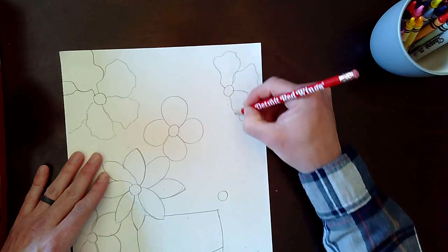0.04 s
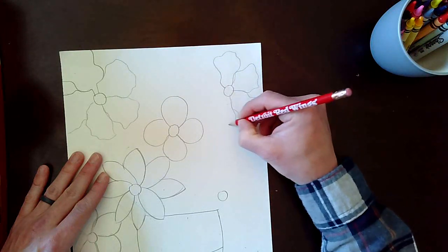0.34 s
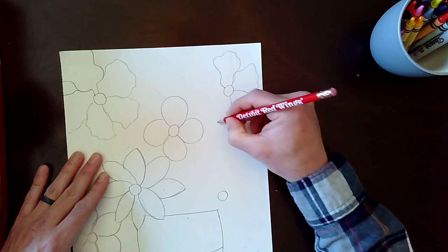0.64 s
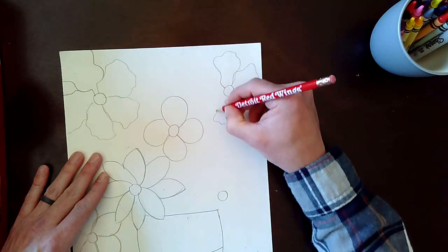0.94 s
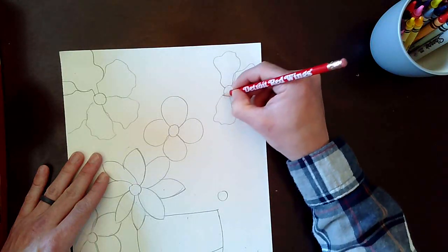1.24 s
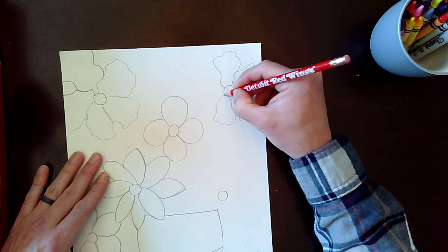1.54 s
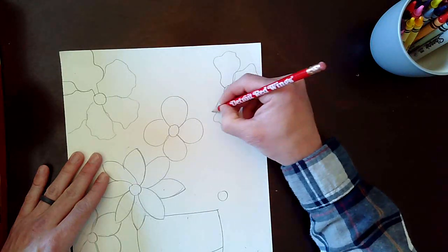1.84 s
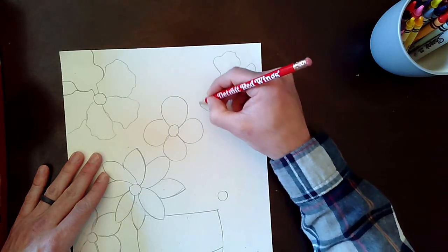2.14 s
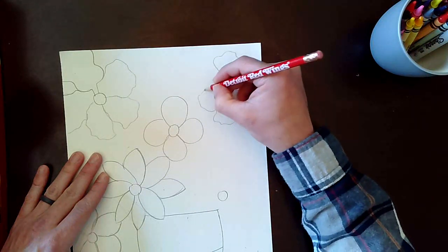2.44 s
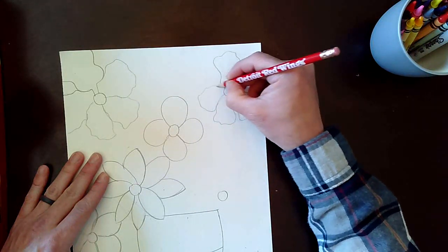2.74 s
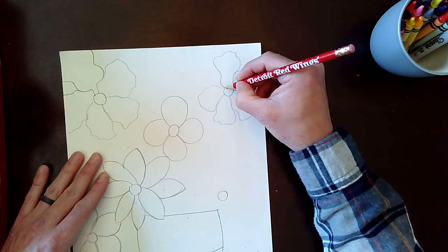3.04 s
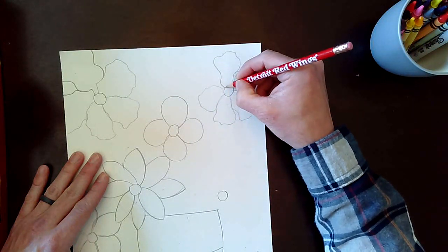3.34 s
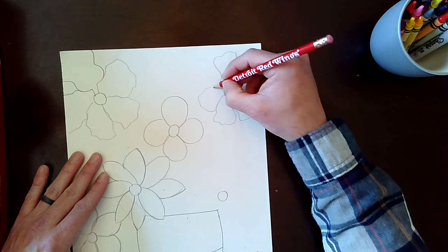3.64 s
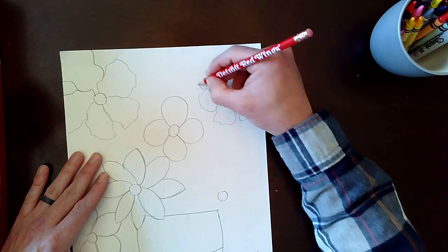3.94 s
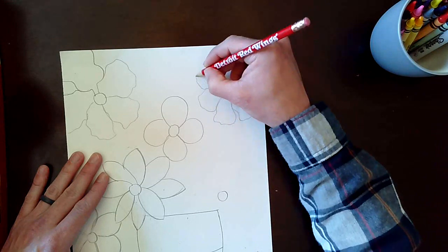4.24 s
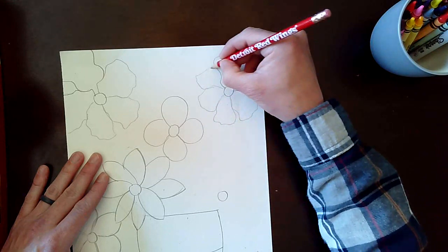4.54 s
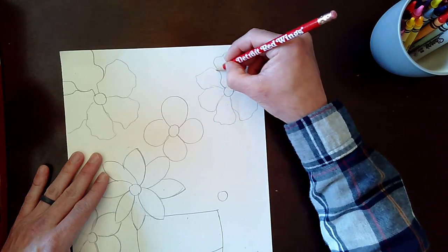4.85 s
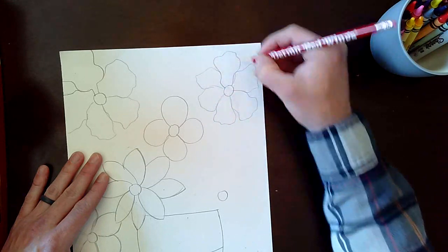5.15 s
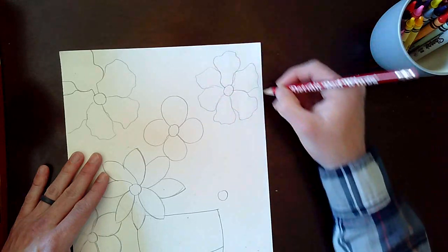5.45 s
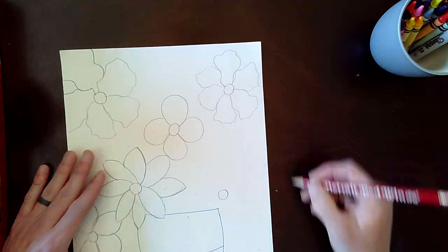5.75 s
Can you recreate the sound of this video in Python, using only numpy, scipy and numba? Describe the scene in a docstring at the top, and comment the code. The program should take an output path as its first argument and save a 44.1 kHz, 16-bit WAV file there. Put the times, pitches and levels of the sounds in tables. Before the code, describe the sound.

In a quiet room, heard from close by, a pencil makes light, hissy strokes on paper, stopping and starting. The hand brushes the sheet and softly bumps the wooden table between groups of strokes. After a last run of scratches, the forearm drags away with a rising swish of cloth, several sharp cuff clicks and a light knock, the loudest part.

```python
"""Pencil on paper

A pencil outlines flower petals on one sheet of paper on a wooden table, in a quiet room. Stick-slip
friction of the lead on the fibres excites the modes of pencil, sheet and table top; between strokes
the hand shifts. At the end the forearm slides off: the sleeve swishes, its cuff clicks and the wrist
bumps the table."""
import sys
import numpy as np
from scipy import signal
from scipy.fft import rfft, irfft
from scipy.io import wavfile
from scipy.ndimage import uniform_filter1d
from numba import njit

SR = 44100
rng = np.random.default_rng(int(sys.argv[2]) if len(sys.argv) > 2 else 0)


def wav_out(sig):
    """Save sig, one row per channel (or a flat mono array), as 16-bit PCM at SR to the path in sys.argv[1]."""
    wavfile.write(sys.argv[1], SR, np.round(np.clip(np.atleast_2d(sig).T, -1, 1) * 32767).astype(np.int16))


N = 264820
TIME = np.arange(N) / SR

# Pencil strokes: t/s, rise/s, fall/s, nominal level/dB, then relative to it hiss/dB,
# shaft and sheet/dB, table top/dB; tip mode f/Hz
PENCIL_STROKES = [ (-0.02, 0.03, 0.16, -45.5, -6, -9, -19.5, 6070),
                  (0.17, 0.077, 0.037, -64, 3.5, 8, 4.5, 6060),
                  (0.338, 0.1, 0.043, -60, -4.5, 0.5, 3.5, 5940),
                  (0.46, 0.044, 0.12, -65.5, -1.5, 1.5, 5, 5830),
                  (0.599, 0.053, 0.19, -61, -3.5, -4, -5.5, 6030),
                  (0.84, 0.054, .04, -61, 2, -4, -10, 6300), (0.985, .035, 0.057, -66, -2, -4, -10.5, 6100),
                  (1.087, 0.021, 0.1, -58, 1, -1.5, -16.5, 6570),
                  (1.225, 0.032, 0.026, -61, -3.5, -8, -17, 6500),
                  (1.274, 0.024, 0.064, -67, -1, 1, -6, 6500),
                  (1.717, 0.052, 0.049, -48.5, 0.5, -5, -13, 6400),
                  (1.79, 0.025, 0.063, -64.5, -3, 6.5, 7.5, 6450),
                  (1.89, .11, .10, -50, -5.5, -8, -5, 6030),
                  (2.182, 0.035, 0.051, -47.5, -4.5, -11.5, -23, 6250),
                  (2.265, 0.034, 0.13, -64, -1.5, -8, -7.5, 6230),
                  (2.448, .025, 0.078, -58, -2, -9.5, -15.5, 6500),
                  (2.645, .035, 0.1, -67.5, 1, -3.5, -11, 6200),
                  (2.765, 0.081, 0.051, -56.5, -9, -11, -20, 6250),
                  (3.769, .09, 0.082, -47, -6, -9.5, -8.5, 5960),
                  (3.889, 0.077, 0.082, -49.5, -6, -4.5, -8, 6070),
                  (4.03, 0.028, 0.036, -66.5, -5, -3, 5.5, 5820),
                  (4.11, 0.13, 0.036, -70, 4, 1.5, -2.5, 6250),
                  (4.218, 0.016, 0.042, -50.5, -1, -2, -14, 6900),
                  (4.265, 0.021, .05, -68.5, -8, 9, 3, 6800), (4.324, 0.088, 0.11, -54, -4, -8, -9, 6230),
                  (4.53, 0.03, 0.11, -70.5, -3.5, -7, -1, 6230),
                  (4.797, 0.023, 0.076, -65.5, 1.5, -1, -24, 6200),
                  (4.875, 0.056, 0.076, -52.5, -9.5, -9.5, -21, 6160),
                  (4.991, 0.0079, .033, -59, 3.5, -7, -16, 6200), ]
# Shaft modes, tuned and damped by the fingers: t/s, low mode f/Hz, its level/dB, high mode f/Hz
SHAFT_MODES = [(0, 2830, -2.5, 4260), (.4, 2840, -0.5, 3980), (1.15, 2780, -7.5, 3860),
               (1.8, 2800, 3, 4320), (1.93, 2700, -0.5, 4050), (2.1, 2450, -1.5, 3920),
               (2.5, 2360, -13, 4300), (2.85, 2450, -11.5, 4330), (4.0, 2390, -4, 4110),
               (4.25, 2300, -19, 3850), (4.42, 2290, -7.5, 4260), (4.9, 2390, -15.5, 4400)]
# Spectrum of the fibres under the lead: f/Hz, level/dB
FIBRE_SPECTRUM = [(300, -2), (1500, -25.5), (3600, -14.5), (5100, -0.5), (6900, 4.5), (8000, 4.5),
                  (10000, 4.5), (12300, -2.5), (13300, -3.5), (15800, -8.5)]
# Overtones of the pencil's point: f/Hz, width/Hz, level/dB
TIP_OVERTONES = [(6926, 860, 2.5), (7800, 2100, -0.5), (9700, 920, -23), (12030, 1600, 0)]
# Modes of the sheet: f/Hz, width/Hz, level/dB
SHEET_MODES = [(2210, 510, 0.5), (2596, 350, 1.5), (3026, 145, -4.5), (3407, 600, -0.5), (3797, 830, -1),
               (4504, 500, -1.5), (4870, 760, -0.5), (5505, 230, 1)]
# Modes of the table top: f/Hz, width/Hz, level/dB
WOOD_MODES = [(133, 180, -18), (386, 330, -12), (712, 143, -0.5), (920, 184, -2), (1118, 143, 0.5),
              (1337, 113, -2), (1823, 230, -6)]
# Judders of the lead against the grain: t/s, rise/s, fall/s, level/dB, f/Hz
LEAD_JUDDERS = [(0.405, 0.029, 0.018, -57.5, 687), (0.495, 0.023, 0.066, -64, 678),
                (1.88, 0.032, 0.053, -61.5, 660), (3.85, .025, .05, -64, 720), (4.96, .02, .015, -67, 960)]
# Shifts of the hand: t/s, rise/s, fall/s, nominal level/dB, swish f/Hz,
# relative brush/dB, relative drag/dB
HAND_SHIFTS = [(1.526, 0.022, 0.058, -67.5, 5340, -10, -8), (2.95, 0.056, 0.048, -78, 7050, -0.5, -14),
               (3.196, 0.019, 0.044, -61.5, 8300, -10, -40), (3.43, 0.065, 0.033, -58.5, 6700, -4.5, -10.5),
               (3.50, 0.042, 0.077, -55, 5700, -6.5, -11.5), (3.625, 0.035, 0.066, -54, 5500, -3, -8),
               (3.70, 0.078, 0.14, -55, 5500, -8, -29)]
# Slide of the forearm: t/s, nominal level/dB, swish f/Hz, relative brush/dB, relative drag/dB
ARM_SWEEP = [(5.14, -77, 6700, 0, -27), (5.197, -56, 6600, -9, -32), (5.206, -52.5, 6430, -2, -21),
             (5.245, -48.5, 5430, -13, -17), (5.3, -48, 6600, -11, -20.5), (5.39, -48.5, 7650, -14.5, -40),
             (5.438, -46, 7800, -9.5, -27), (5.46, -48, 6840, 2.5, -5.5), (5.55, -47, 5560, 0.5, -9.5),
             (5.67, -37, 5100, -1.5, -21.5), (5.715, -34.5, 5030, -2, -4.5), (5.79, -32, 5230, -6.5, -12.5),
             (5.85, -36, 6460, -7, -10.5), (5.9, -37, 5900, -5.5, -14), (5.912, -56, 6000, 7.5, -2),
             (6.0, -68.5, 6500, 10, -4)]
# Spectrum of brushing cloth: f/Hz, level/dB
BRUSH_SPECTRUM = [(600, -31), (1400, -20.5), (2500, -16), (3900, -3.5), (4750, -1.5), (6000, 1.5),
                  (8500, 3.5), (11000, -4), (13500, -12), (15700, -16)]
# Spectrum of the arm dragging on wood: f/Hz, level/dB
DRAG_SPECTRUM = [(45, -5), (75, 2), (165, 1), (280, -13), (550, -4.5), (1000, -10.5), (1400, 1), (1620, 2),
                 (1900, 5), (2500, -2), (3000, 7), (4000, -5), (6000, -47)]
# Zips of the weave over the paper's edge: t/s, rise/s, fall/s, level/dB, starting f/Hz
WEAVE_ZIPS = [(5.275, .04, .008, -41, 6510), (5.333, 0.026, .03, -44, 6600), (5.822, .012, .005, -33, 6420),
              (5.845, .008, .008, -32, 7240)]
# Ticks of lead and cuff: t/s, peak level/dB, f/Hz, nominal width/Hz, T60/s
HARD_CONTACTS = [(0.474, -46, 8600, 5000, 0.013), (1.091, -45.5, 8500, 5000, .03),
                 (1.626, -53.5, 9200, 4000, 0.0064), (2.197, -38.5, 6300, 1100, .08),
                 (4.2199, -44, 3720, 900, 0.15), (4.225, -32.5, 8700, 3470, 0.03),
                 (4.799, -48, 6300, 7100, 0.028), (5.0712, -40, 7900, 5070, 0.01),
                 (5.203, -45, 6200, 5000, 0.052), (5.487, -29.5, 7700, 3000, .011),
                 (5.514, -33, 7840, 5000, 0.0079), (5.596, -24, 7800, 5000, .009),
                 (5.602, -19.5, 5950, 4000, 0.0093), (5.677, -11.5, 4600, 1080, .0066),
                 (5.68, -19.5, 3180, 1490, 0.0085), (5.6912, -15, 8640, 3000, 0.019),
                 (5.692, -29, 4760, 1000, 0.038), (5.708, -19.5, 1740, 1930, .01),
                 (5.836, -15.5, 6470, 1800, 0.0065), (5.866, -20, 5270, 5000, 0.01),
                 (5.897, -22.5, 5600, 2500, 0.0081)]
# Bumps of hand and wrist on the table: t/s, nominal level/dB, f/Hz, T60/s
SOFT_CONTACTS = [(1.637, -51, 401, 0.06), (1.65, -52.5, 277, 0.11), (1.662, -51.5, 179, 0.068),
                 (3.674, -53, 374, 0.12), (3.697, -50, 240, 0.09), (4.803, -59.5, 346, 0.11),
                 (5.708, -32.5, 760, 0.014), (5.719, -32, 117, 0.047), (5.817, -38.5, 487, 0.031),
                 (5.877, -60, 115, 0.062)]
# Spectrum of the room's noise: f/Hz, level/dB
ROOM_SPECTRUM = [(15, -47), (25, -12), (86, -2), (194, -3), (228, -9), (307, -7), (380, -11), (586, -12.5),
                 (767, -16), (854, -18.5), (1000, -17), (1120, -18.5), (1350, -23), (15700, -29)]
# Hum of a distant appliance: f/Hz, level/dB
HUM_PARTIALS = [(124, -93.5), (328, -82)]


def pencil():
    """Stick-slip excitation: the lead snaps over fibres and drives point, shaft, sheet and table."""
    strokes = np.array(PENCIL_STROKES)
    scratch_db, hiss_db, shaft_db, table_db, pitch_hz = strokes[:, 3:].T
    motion = swells(strokes[:, :3], depth_db=8.5, release_db_per_s=324)
    tip_hz = handover(motion, pitch_hz)
    low_hz, low_db, high_hz = curves(SHAFT_MODES)
    # the paper's uneven tooth makes the friction flutter
    slips = grains(per_s=9000, spread_db=1.5) * undb(0.83 * walk(260) + 0.37 * walk(60))
    tip = ring(slips, tip_hz * (1 + 0.03 * walk(25)), width_hz=940) * undb(-3)
    fibres = colour(slips, FIBRE_SPECTRUM) * undb(2)
    overtones = modes(slips, TIP_OVERTONES, wander_db=2.5, drift=0.02) * undb(-7)
    # the shaft's pitch wavers as the fingers steer it
    shaft_low = ring(slips, low_hz * (1 + 0.014 * walk(21.06)), width_hz=310) * undb(low_db)
    shaft_high = ring(slips, high_hz * (1 + 0.026 * walk(18)), width_hz=320) * undb(-12)
    sheet = modes(slips, SHEET_MODES, wander_db=5, drift=0.023) * undb(-2.5)
    # when the point rings higher, the table's upper modes answer more strongly
    tilt = 0.0244 * (tip_hz - 6084)
    table = modes(slips, WOOD_MODES, wander_db=2.5, drift=0.047, tilt_db_per_octave=tilt) * undb(0.17)
    parts = [(tip, 0), (fibres + overtones, hiss_db), (shaft_low + sheet, shaft_db),
             (shaft_high, shaft_db - hiss_db),  # sings less the more the point hisses
             (table, table_db)]
    return sum(sound * loudness(motion, scratch_db + share_db) for sound, share_db in parts)


def judder():
    """Friction-induced vibration: the lead slips in step with one table mode, in a hollow groan."""
    judders = np.array(LEAD_JUDDERS)
    db, hz = judders[:, 3:].T
    motion = swells(judders[:, :3], depth_db=7.5, release_db_per_s=450)
    return loudness(motion, db) * ring(rng.standard_normal(N), handover(motion, hz), width_hz=100)


def sleeve():
    """Sliding friction follows the motion: small shifts of the hand, then the forearm's sweep."""
    shifts = np.array(HAND_SHIFTS)
    db, hz, brush_db, drag_db = shifts[:, 3:].T
    motion = swells(shifts[:, :3], depth_db=6.5, release_db_per_s=260)
    shifting = [handover(motion, hz)] + [loudness(motion, db + part) for part in (0, brush_db, drag_db)]
    db, hz, brush_db, drag_db = curves(ARM_SWEEP)
    sweeping = [hz] + [undb(db + part) for part in (0, brush_db, drag_db)]
    sweep_start_s = ARM_SWEEP[0][0]
    return rub(*np.where(TIME < sweep_start_s, shifting, sweeping))


def rub(swish_hz, swish_gain, brush_gain, drag_gain):
    """Roughness noise: cloth and skin brush the paper while the arm's weight drags on the wood."""
    catch = undb(1.33 * walk(200))  # the cloth catches and lets go
    brush = colour(grains(per_s=16000, spread_db=4), BRUSH_SPECTRUM)
    cloth_slips = grains(per_s=8000, spread_db=3)
    swish = ring(cloth_slips, swish_hz * (1 + 0.039 * walk(25)), width_hz=2230) * undb(-4.5)
    drag = grains(per_s=5500, spread_db=1.8)
    edge_s, crossing_s = 5.9, 0.051  # the wrist leaves the paper and bare wood takes over
    on_wood = np.clip((TIME - edge_s) / crossing_s, 0, 1)
    sheet = modes(drag, SHEET_MODES, wander_db=7.5, drift=0.056, tilt_db_per_octave=-3)
    sheet *= undb(-4 - 10 * on_wood)
    wood = colour(drag, DRAG_SPECTRUM) * undb(-1.5 + 4.3 * on_wood)
    return catch * (brush * brush_gain + swish * swish_gain) + (sheet + wood) * drag_gain


def weave(glide_hz_per_s=5400):
    """Periodic plucking: threads cross the paper's edge in a whistle that rises as the arm speeds up."""
    zips = np.array(WEAVE_ZIPS)
    start, _, _, db, first_hz = zips.T
    motion = swells(zips[:, :3], depth_db=10, release_db_per_s=605)
    elapsed = np.maximum(TIME - handover(motion, start), 0)
    hz = handover(motion, first_hz) + glide_hz_per_s * elapsed
    stutter = unit(undb(4.5 * walk(230)))
    return loudness(motion, db) * stutter * ring(rng.standard_normal(N), hz, width_hz=510)


def ticks():
    """Impact transients: each hard contact is a fast-decaying burst of tiny blows on a resonance."""
    out, t = np.zeros(N), TIME[:8192]
    for start, db, hz, width_hz, t60 in HARD_CONTACTS:
        impacts = rng.choice([-1., 1.], len(t)) * decay(t, t60)
        burst = ring(impacts, hz, 1.15 * width_hz)
        add(out, start, undb(db) * burst / np.abs(burst).max())
    return out


def bumps():
    """Damped free vibration: a soft blow swings the table top, with a dull rumble around its pitch."""
    out, t = np.zeros(N), TIME[:8192]
    for start, db, hz, t60 in SOFT_CONTACTS:
        swing = np.sin(2 * np.pi * hz * t)
        onset = 1 - np.exp(-t / .002)
        rumble = ring(rng.standard_normal(len(t)), hz, 1.1 * hz) * onset
        add(out, start, undb(db) * (0.71 * swing + 0.74 * rumble) * decay(t, t60))
    return out


def reflections(x, t60, wet_db):
    """Diffuse reflection: echoes from nearby surfaces merge into an exponentially decaying tail."""
    t = TIME[:16384]
    tail = rng.standard_normal(len(t)) * decay(t, t60) * (t > .002)
    return undb(wet_db) * signal.fftconvolve(x, tail / np.linalg.norm(tail))[:N]


def room_tone():
    """Ambient noise: broadband rumble and faint hiss, with the tonal hum of a distant appliance."""
    air = colour(rng.standard_normal(N), ROOM_SPECTRUM) * undb(-71 + .5 * walk(4.9))
    hum = sum(undb(db + 2 * walk(2.6)) * np.sqrt(2) * np.sin(2 * np.pi * hz * TIME)
              for hz, db in HUM_PARTIALS)
    return air + hum


def modes(x, table, wander_db, drift, tilt_db_per_octave=0):
    """Modal superposition: modes swell and fade as the contact passes nodes; the hand detunes them."""
    centre_hz = np.median([hz for hz, _, _ in table])
    out = 0
    for hz, width_hz, db in table:
        octaves = np.clip(np.log2(hz / centre_hz), -1, 1)
        share_db = db + wander_db * np.tanh(walk(11)) + tilt_db_per_octave * octaves
        out = out + undb(share_db) * ring(x, hz * (1 + drift * walk(8)), width_hz)
    return unit(out)


def ring(x, hz, width_hz):
    """Resonance with steep skirts: two band-passes in cascade, each width_hz wide, at rms 1."""
    centre_hz = np.minimum(hz * np.ones(len(x)), .45 * SR)
    once = bandpass(x, centre_hz, float(width_hz))
    return unit(bandpass(once, centre_hz, float(width_hz)))


@njit
def bandpass(x, hz, width_hz):
    """Second-order resonator: a state-variable filter with a moving centre."""
    y, band_state, low_state = np.empty(len(x)), 0., 0.
    for i in range(len(x)):
        gain, damping = np.tan(np.pi * hz[i] / SR), width_hz / hz[i]
        band = (band_state + gain * (x[i] - low_state)) / (1 + gain * (gain + damping))
        band_state = 2 * band - band_state
        low_state += 2 * gain * band
        y[i] = damping * band
    return y


def colour(x, spectrum):
    """Spectral shaping by (f/Hz, level/dB) points, at rms 1."""
    hz, db = np.transpose(spectrum)
    bins_hz = np.maximum(np.fft.rfftfreq(N, 1 / SR), 1)
    gain = undb(np.interp(np.log(bins_hz), np.log(hz), db))
    return unit(irfft(rfft(x) * gain, N))


def grains(per_s, spread_db):
    """Shot noise: tiny slips at random moments, a few much stronger than the rest."""
    sizes = undb(spread_db * np.minimum(rng.exponential(size=N), 5))
    slipping = rng.random(N) < per_s / SR
    return unit(slipping * rng.choice([-1, 1], N) * sizes)


def walk(per_s):
    """Random modulation at rms 1, gliding to a new value per_s times a second."""
    hold = max(int(SR / per_s), 1)
    steps = np.repeat(rng.standard_normal(N // hold + 1), hold)
    return unit(uniform_filter1d(steps, hold)[:N])


def swells(timing, depth_db, release_db_per_s):
    """Friction noise grows with speed: one envelope for each movement's (t/s, rise/s, fall/s)."""
    envelopes = []
    for start, rise, fall in timing:
        t = TIME - start - rise  # from the fastest moment
        slowness = np.maximum(-t / max(rise, .002), np.minimum(t / max(fall, .002), 1))
        db = -depth_db * slowness ** 1.73 - release_db_per_s * np.maximum(t - fall, 0)
        envelopes.append(undb(np.maximum(db, -120)))
    return np.array(envelopes)


def loudness(envelopes, db):
    """Incoherent addition: the gain of movements whose powers sum, each at its own level."""
    return np.sqrt(undb(db) ** 2 @ envelopes ** 2)


def handover(envelopes, values):
    """Weighted mean: a setting passes smoothly from each movement to the next."""
    weights = envelopes + 1e-9
    return values @ weights / weights.sum(axis=0)


def curves(rows):
    """Linear interpolation of each column over the times in the first."""
    times, *columns = np.transpose(rows)
    return [np.interp(TIME, times, column) for column in columns]


def decay(t, t60):
    """Exponential damping: 60 dB down at t60."""
    return np.exp(-np.log(1000) * t / t60)


def add(out, start_s, sound):
    """Superposition of a short sound from start_s on."""
    start = int(start_s * SR)
    out[start:start + len(sound)] += sound[:N - start]


def undb(db):
    """Amplitude ratio of a level in decibels."""
    return 10 ** (np.asarray(db) / 20)


def unit(x):
    """Normalisation to rms 1."""
    return x / np.sqrt(np.mean(x ** 2))


def scene():
    """Superposition of the direct sound from the table, its reflections and the room's noise."""
    direct = pencil() + judder() + sleeve() + weave() + ticks() + bumps()
    # a cup and other small things on the table reflect only short wavelengths
    treble = signal.sosfilt(signal.butter(2, 1800, "high", fs=SR, output="sos"), direct)
    echoes = reflections(treble, t60=0.052, wet_db=-9) + reflections(direct, t60=0.14, wet_db=-7.5)
    return (direct + echoes + room_tone())[None]


def record(dry):
    """Band limiting: a gentle high-pass thins the deepest bass and a steep low-pass cuts the top."""
    bottom_hz, top_hz = 41.7, 15700
    thinned = signal.sosfilt(signal.butter(2, bottom_hz, "high", fs=SR, output="sos"), dry)
    return signal.sosfilt(signal.ellip(10, .2, 70, top_hz, fs=SR, output="sos"), thinned)


dry = scene()
out = record(dry)
wav_out(out)
```